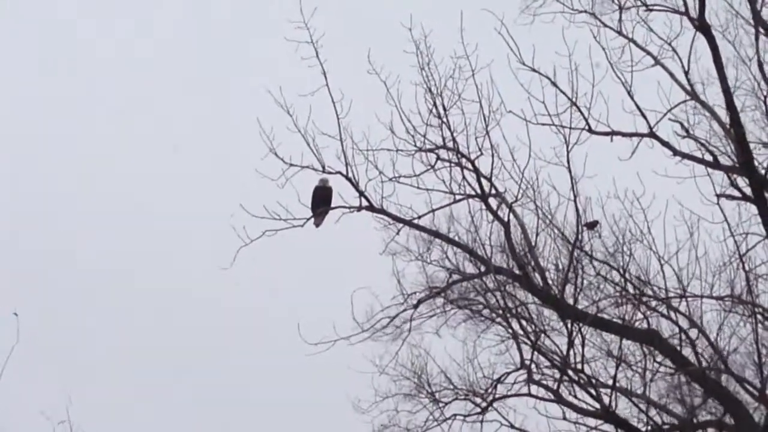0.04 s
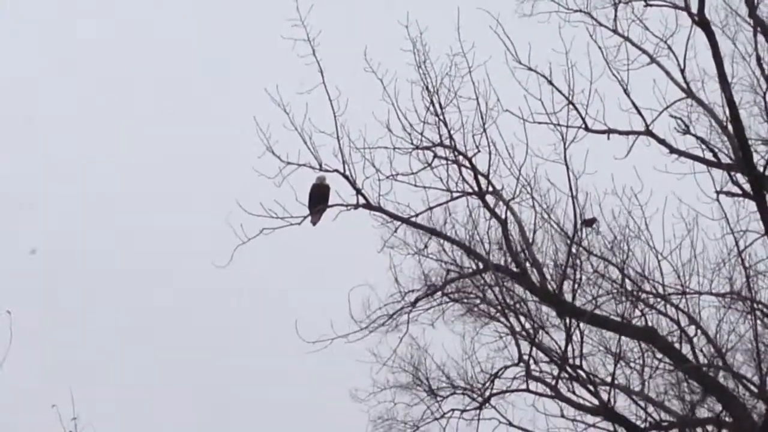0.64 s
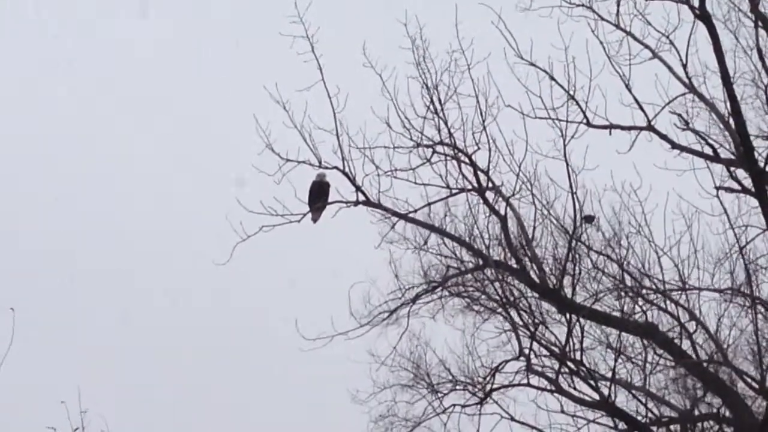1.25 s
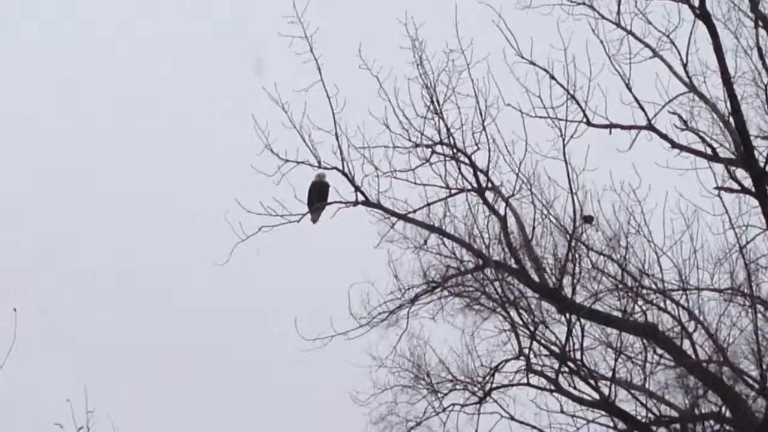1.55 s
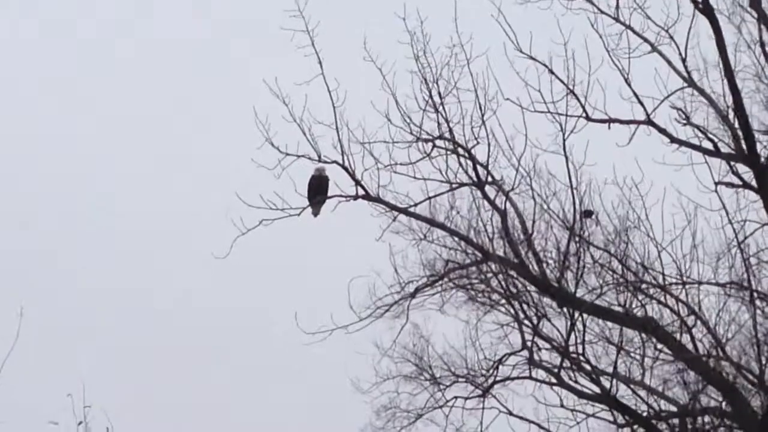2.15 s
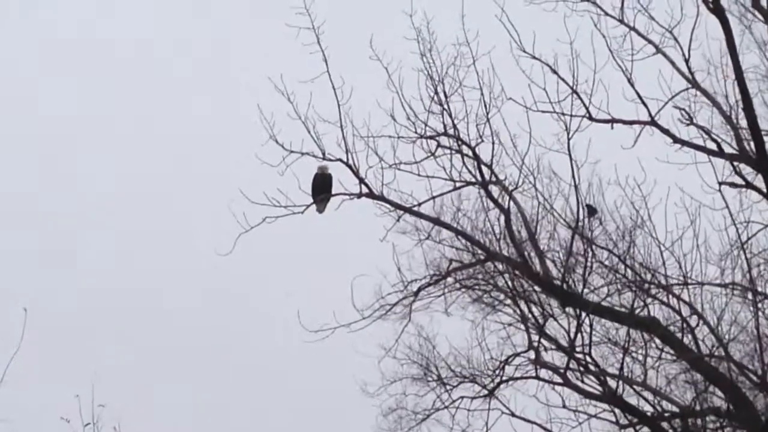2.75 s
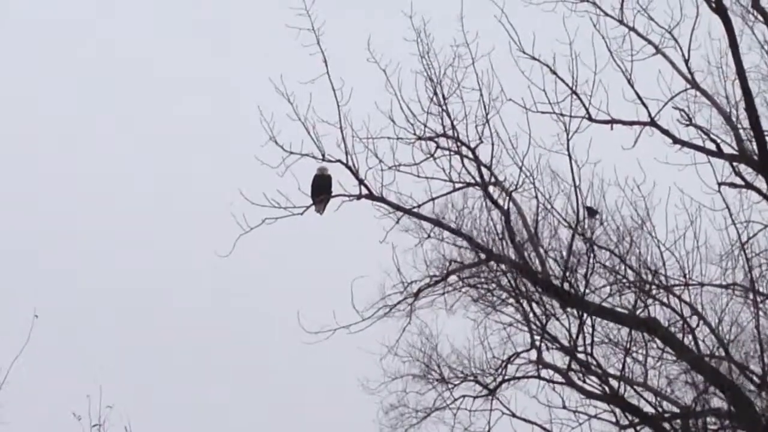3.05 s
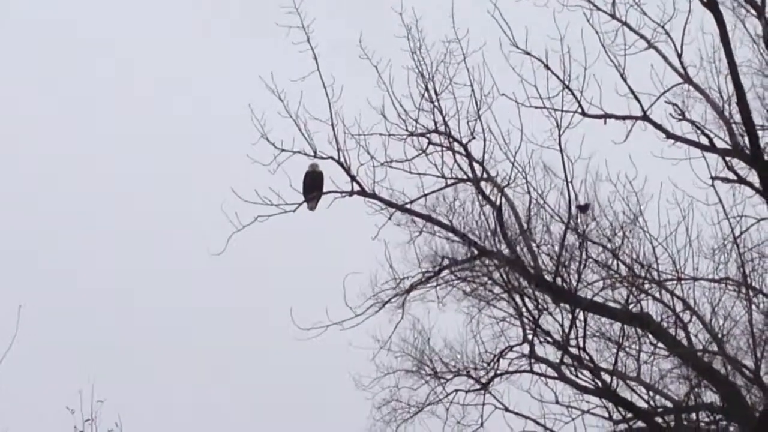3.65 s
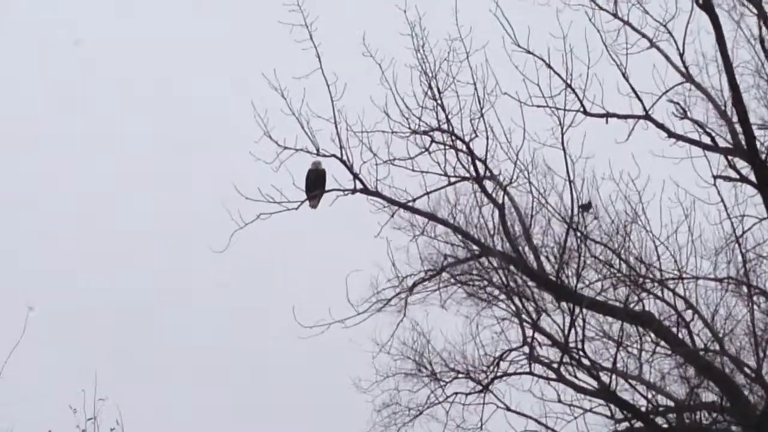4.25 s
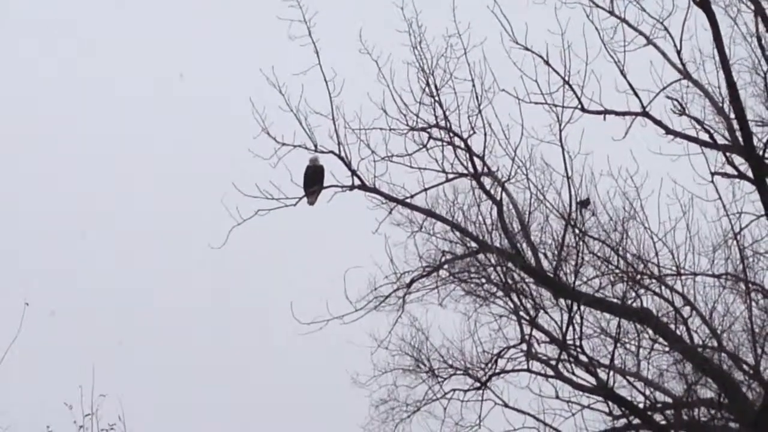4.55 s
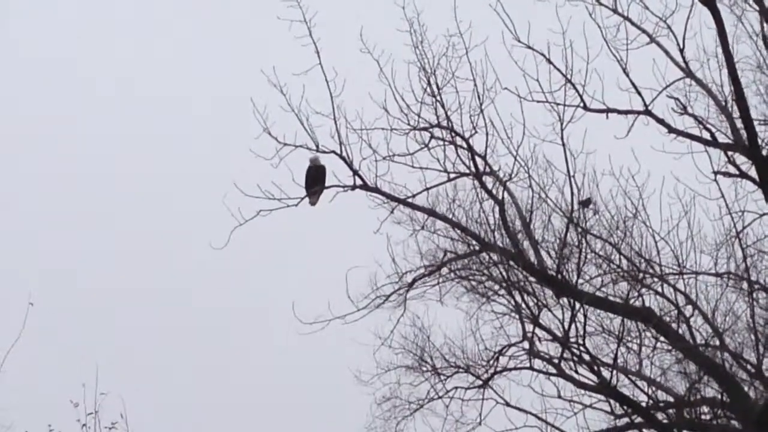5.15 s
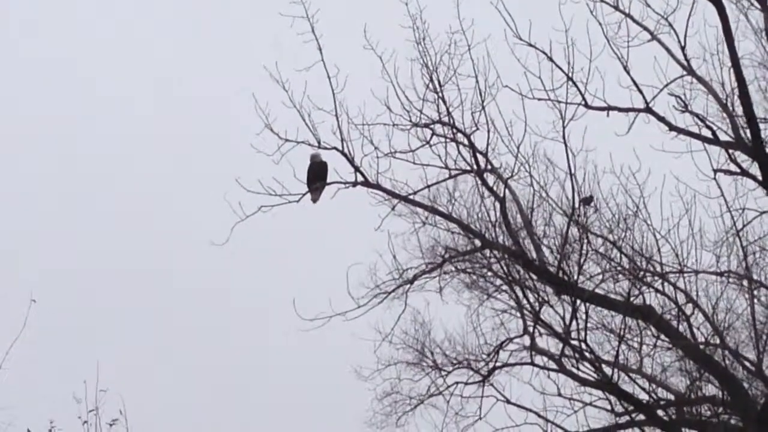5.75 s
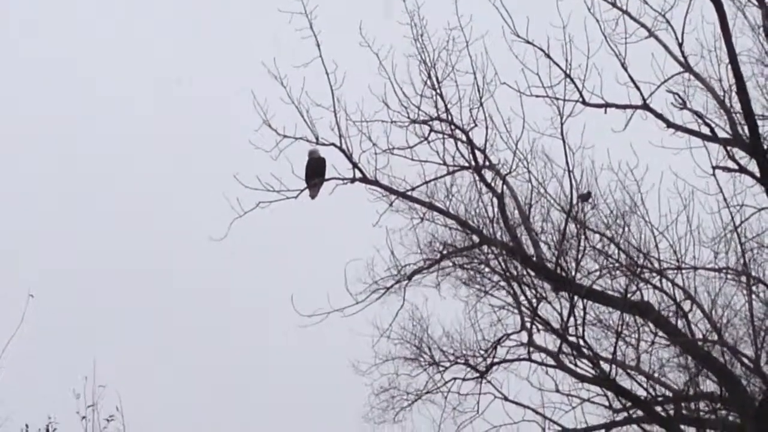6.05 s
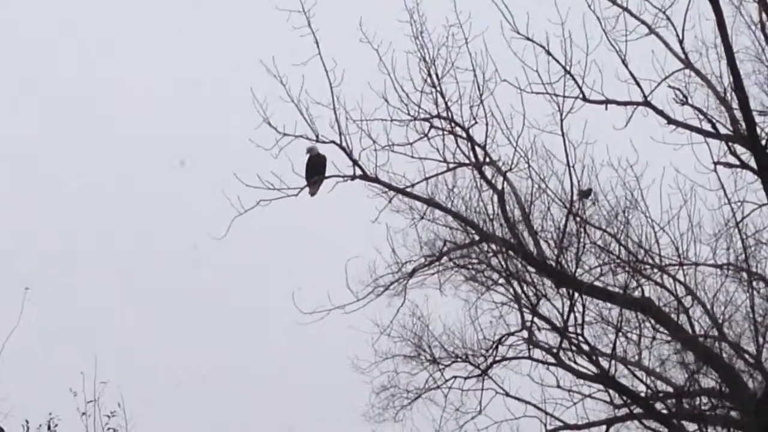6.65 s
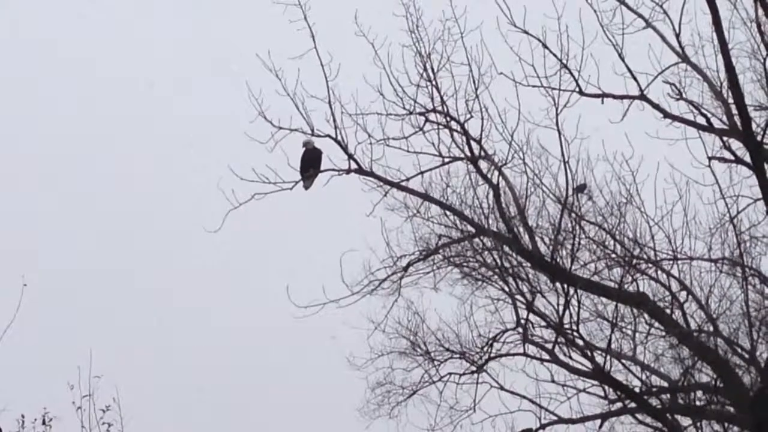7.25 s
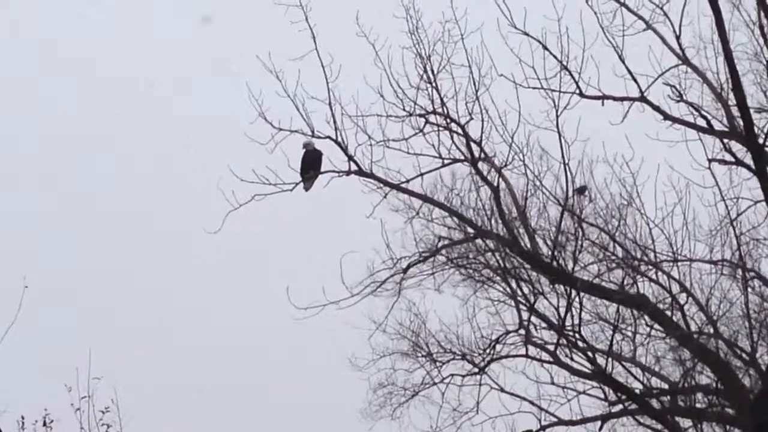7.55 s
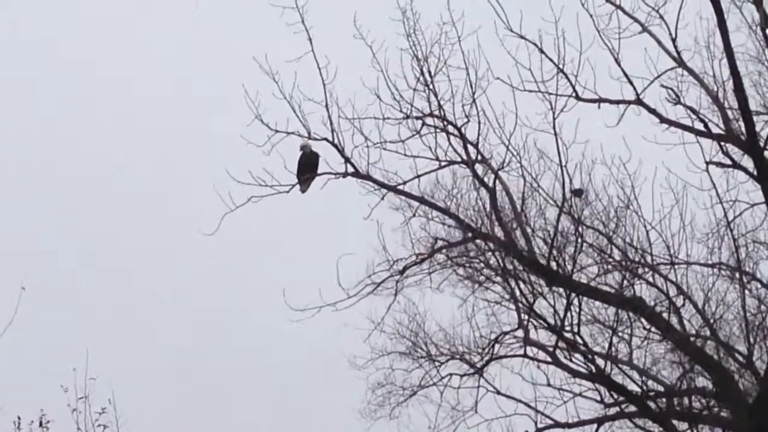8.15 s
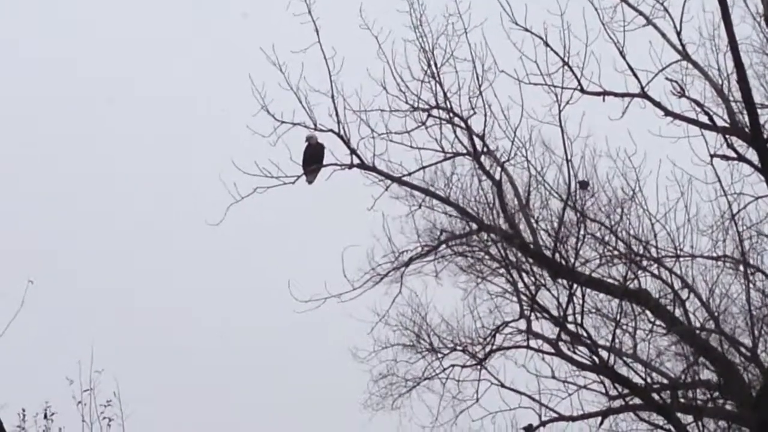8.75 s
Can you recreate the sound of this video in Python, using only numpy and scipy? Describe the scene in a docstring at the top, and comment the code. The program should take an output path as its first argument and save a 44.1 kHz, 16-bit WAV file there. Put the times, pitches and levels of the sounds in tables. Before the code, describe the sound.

Small birds chirp and twitter outdoors over steady hiss, with two hoarse crow caws and low wind gusts bumping the microphone.

```python
"""Small birds in winter trees

A distant flock chatters: thousands of tiny whistles, blurred by echoes from bare branches.
Nearer chirps, thin calls and scrapes stand out, and a hoarse crow caws twice.
Gusts thump the microphone, and a faint low hum comes and goes under the outdoor hiss."""
import sys
import numpy as np
from scipy import signal
from scipy.fft import rfft, irfft
from scipy.io import wavfile

SR = 44100
rng = np.random.default_rng(int(sys.argv[2]) if len(sys.argv) > 2 else 0)


def transcribe(u):
    """Save the signal u as a 16-bit wav file named by the first command-line argument.

    u: samples, shape (n,) or (channels, n), limited to [-1, 1]; the rate is SR.
    q: integer samples, one column per channel.
    """
    v = np.clip(np.atleast_2d(u).T, -1, 1)
    q = np.round(v * 32767).astype(np.int16)
    wavfile.write(sys.argv[1], SR, q)


N = 392931
TIME, HZ = np.arange(N) / SR, np.fft.rfftfreq(N, 1 / SR)
TWIG_ECHO_S = .22  # time for an echo in the twigs to fade by 60 dB

# how loud the far flock is (time [s], level [dB])
FLOCK_LOUDNESS = [(0.0, -49.5), (0.69, -49.5), (1.21, -48.5), (1.53, -46.5), (1.71, -51), (2.43, -49),
                  (2.75, -51), (3.57, -49.5), (3.97, -59), (4.68, -49), (5.08, -54.5), (6.22, -51),
                  (6.69, -49), (7.36, -51), (7.78, -47.5), (8.13, -51.5), (8.53, -49), (8.9, -55)]
# tone of its main chatter and of its shrill edge (frequency [Hz], boost [dB])
CHATTER_TONE = [(2000, 5.5), (2600, -14.5), (3100, -5), (3700, -1), (4400, -2), (5100, -7), (6000, -16),
                (8000, -19)]
SHRILL_TONE = [(3500, 4), (4700, 3.5), (5400, -10), (6300, -4.5), (7500, -8), (9500, -12.5), (14000, -13)]
def flock(answer_s=.23, answer_lag_s=.0065, answer_db=-4, follow=.21, flicker_db=.66):
    """The far flock chatters, and swells as neighbours join in around each near call."""
    din = coloured(chatter(2400, 6200, count=3200, warble=.031), CHATTER_TONE)
    shrill = coloured(chatter(4400, 12000, count=2400, warble=.1253), SHRILL_TONE)
    starts, lengths, *_, call_db = np.transpose(near_calls())
    peaks = starts + lengths / 2 + answer_lag_s
    extra_db = follow * (call_db - call_db.mean())  # louder calls get louder answers
    answers = swells([(s, answer_s, answer_db + db) for s, db in zip(peaks, extra_db)])
    level_db = np.interp(TIME, *np.transpose(FLOCK_LOUDNESS)) + flicker_db * drift(N, 38)
    return np.hypot(1, answers) * gain_of(level_db) * (gain_of(-.48) * din + gain_of(-15) * shrill)


def chatter(low_hz, high_hz, count, warble, spread_db=3.5, fall=.1614, bend=.1007):
    """Many far birds at once: short, shaky, arched notes that rise or fall."""
    out = np.zeros(N)
    for when, span, pitch, slope, arch, softness in rng.random((count, 6)):
        hz = low_hz * (high_hz / low_hz) ** pitch
        slide = fall * (2 * slope - .7)
        length = .014 + .032 * span
        note = whistle(length, hz * (1 + slide), hz * (1 + bend * arch), hz * (1 - slide), warble)
        add(out, when * N / SR - .02, gain_of(-spread_db * np.log(softness + .085)) * note)
    return out + gain_of(-4) * tree_echo(out, fade_s=.36)


# chirps that slide down (time [s], length [s], middle pitch [Hz], level [dB])
FALLING_CHIRPS = [(0.196, .09, 3710, -46.5), (0.753, 0.051, 4020, -46.5), (0.939, 0.056, 3600, -47.5),
                  (1.11, 0.071, 4590, -47), (1.467, 0.061, 4640, -49.5), (1.524, .069, 3700, -49),
                  (1.631, 0.032, 4070, -48.5), (1.736, 0.025, 4600, -46), (1.886, .051, 3670, -51),
                  (2.147, .04, 4300, -46.5), (2.216, .041, 3500, -47.5), (2.688, 0.039, 3770, -52),
                  (2.771, .066, 3570, -53), (2.971, 0.092, 3960, -47.5), (3.557, 0.067, 4070, -51),
                  (3.681, 0.062, 3690, -48.5), (4.129, .075, 3520, -47.5), (4.288, 0.038, 3450, -54),
                  (4.455, 0.063, 4250, -46.5), (4.527, .05, 2800, -52.5), (4.684, .09, 2840, -60),
                  (4.843, 0.052, 4180, -47.5), (5.449, 0.035, 5000, -45), (5.763, 0.071, 3820, -51),
                  (6.41, .043, 3850, -49), (6.53, .07, 3980, -46.5), (6.794, 0.045, 4210, -51.5),
                  (7.067, 0.061, 3550, -50), (7.398, 0.06, 4030, -45), (7.573, 0.039, 4150, -47.5),
                  (7.813, .041, 4220, -51), (8.318, 0.022, 4020, -44), (8.375, 0.059, 3620, -47.5),
                  (8.603, 0.089, 3850, -49.5), (8.692, .06, 2920, -53.5)]
# short chirps that go up, then down (time [s], top pitch [Hz], rise [share of top], level [dB])
ARCHED_CHIRPS = [(.455, 4180, 0.099, -42.5), (.62, 4430, 0.063, -48.5), (0.681, 4600, 0.036, -51),
                 (1.178, 3250, .02, -50), (1.418, 4460, 0.036, -46.5), (1.77, 2470, .03, -54.5),
                 (1.819, 2870, 0.12, -49), (1.995, 3930, .01, -49.5), (2.329, 2760, .03, -51),
                 (2.47, 5260, .03, -47.5), (2.531, 5420, .06, -48), (3.399, 4390, .15, -53),
                 (3.478, 4980, .05, -51), (4.716, 4550, .22, -46.5), (5.21, 4410, 0.213, -49),
                 (5.296, 5720, 0.084, -49.5), (5.33, 4790, 0.16, -50), (5.607, 4520, 0.28, -51),
                 (6.9, 5630, 0.0091, -53.5), (7.216, 4350, 0.12, -37.5), (7.258, 3590, 0.062, -42),
                 (7.746, 4260, 0.086, -49)]
def near_calls(fall=.115, arch_s=.0256, drop=.056):
    """Lists the near chirps as (time, length, start pitch, middle pitch, end pitch, level)."""
    falling = [(s, length, hz * (1 + fall), hz, hz * (1 - fall), db)
               for s, length, hz, db in FALLING_CHIRPS]
    arched = [(s, arch_s, hz * (1 - rise), hz, hz * (1 - drop), db) for s, hz, rise, db in ARCHED_CHIRPS]
    return falling + arched


def near_birds(roughness=.35, warble_per_s=.42):
    """The nearest birds chirp among the twigs; the longer a note, the more its pitch shakes."""
    out = np.zeros(N)
    for s, length, start, middle, end, db in near_calls():
        add(out, s, gain_of(db) * whistle(length, start, middle, end, warble_per_s * length))
    out *= 1 + roughness * drift(N, 250)
    return out + gain_of(-7) * tree_echo(out, TWIG_ECHO_S)


# high calls (time [s], length [s], start pitch [Hz], middle pitch [Hz], end pitch [Hz], level [dB])
THIN_CALLS = [(3.863, 0.026, 4920, 7280, 7900, -46.5), (4.594, 0.044, 7000, 8350, 7160, -66),
              (7.987, .036, 6760, 7660, 7850, -56)]
def thin_calls(lower_ratio=.89):
    """A closer bird sings with both sides of its voice box, making two sliding notes at once."""
    out = np.zeros(N)
    for s, length, start, middle, end, db in THIN_CALLS:
        upper = whistle(length, start, middle, end, warble=.012)
        lower = whistle(length, start, middle * lower_ratio, end * lower_ratio, warble=.044, octave_db=-8)
        add(out, s, gain_of(db) * (upper + gain_of(-6) * lower))
    return out + gain_of(-6) * tree_echo(out, fade_s=.31) + gain_of(-5) * tree_echo(out, fade_s=.17)


# harsh calls (peak time [s], length [s], middle pitch [Hz], level [dB])
SCRAPING_CALLS = [(1.478, 0.14, 5020, -55.5), (2.239, 0.021, 5080, -46), (2.689, 0.059, 5370, -53.5),
                  (2.964, 0.065, 5620, -56.5), (4.708, 0.089, 5500, -58), (5.762, 0.16, 5320, -57.5),
                  (6.025, 0.11, 6770, -66), (6.171, 0.093, 5170, -54), (7.389, 0.028, 5680, -55),
                  (7.645, .045, 6000, -57), (7.815, 0.028, 5380, -53), (7.968, 0.081, 5150, -55)]
def scraping_calls(warble=.15, fall=.074):
    """Bird notes whose pitch shakes so hard that they turn into a short scrape."""
    out = np.zeros(N)
    for s, length, hz, db in SCRAPING_CALLS:
        start, end = hz * (1 + fall), hz * (1 - fall)
        scrape = sum(whistle(length, start, hz, end, warble, octave_db=-26) for _ in range(3))
        add(out, s - length / 2, gain_of(db - 1) * evened(scrape))
    return out + gain_of(-6) * tree_echo(out, TWIG_ECHO_S)


# the two caws (time [s], length [s], top pitch [Hz], level [dB])
CROW_CAWS = [(5.703, .138, 753, -36.5), (6.113, .148, 757, -33.5)]
# how one caw unfolds (progress [share of length], pitch [share of top], effort [dB])
CAW_ARCH = [(0, .8, -13), (.16, .87, -8.5), (.3, 1, -2), (.45, 0.99, -3), (.58, .93, -6.5),
            (.74, .85, -7.5), (1, .79, -12.5)]
# how the crow's throat shapes its voice (frequency [Hz], boost [dB])
THROAT_TONE = [(700, -20), (1150, -1.5), (1480, 2), (1850, -2.5), (2050, -18), (2260, -7.5), (2600, -35),
               (4000, -48)]
def crow(jitter=.033, rasp=.25, rasp_hz=160, bounce_s=.096):
    """A hoarse voice rises and falls in a narrow throat; the tree line throws it back, blurred."""
    out = np.zeros(N)
    place, bend, effort_db = np.transpose(CAW_ARCH)
    hiss = gain_of(-17) * coloured(rng.standard_normal(N), THROAT_TONE)
    for s, length, top_hz, db in CROW_CAWS:
        size = int(length * SR)
        progress = np.linspace(0, 1, size)
        hz = top_hz * np.interp(progress, place, bend) * (1 + jitter * drift(size, 270))
        phase = 2 * np.pi * np.cumsum(hz) / SR
        # each overtone gets louder as it passes a pitch where the throat rings
        voice = sum(read_tone(THROAT_TONE, k * hz) * np.sin(k * phase) for k in range(1, 6))
        voice *= 1 + rasp * drift(size, rasp_hz)
        # the voice turns hoarser as the effort gives out
        push = gain_of(np.interp(progress, place, effort_db))
        caw = push * evened(voice) + np.sqrt(push) * hiss[int(s * SR):][:size]
        add(out, s, gain_of(db) * caw * signal.windows.tukey(size, .15))
    delayed = np.interp(TIME - bounce_s, TIME, out)
    bounce = gain_of(-17) * tree_echo(delayed * (1 + drift(N, rasp_hz)), TWIG_ECHO_S)
    near_echo = gain_of(-9) * tree_echo(out, TWIG_ECHO_S)
    far_echo = gain_of(-14) * tree_echo(out, fade_s=3)
    return out + bounce + near_echo + far_echo


# gusts at the microphone (peak time [s], length [s], level [dB])
WIND_GUSTS = [(.6, .15, -53), (1.24, 0.17, -47.5), (2.15, 0.87, -57.5), (2.53, 0.25, -49),
              (3.11, 0.42, -41.5), (3.32, 0.3, -38.5), (3.51, 0.32, -44), (4.025, 0.069, -41),
              (4.36, 0.077, -52), (4.625, 0.1, -41.5), (4.775, 0.11, -39), (4.93, 0.096, -45),
              (5.26, 0.23, -42.5), (5.39, 0.13, -43), (5.61, 0.12, -49), (5.85, 0.61, -51.5),
              (5.96, 0.096, -44.5), (6.17, 0.19, -29), (6.275, 0.18, -34), (6.94, 0.048, -45.5)]
# the swirls of air that hit it hardest (time [s], level [dB], pitch [Hz])
HARD_SWIRLS = [(3.096, -23, 149), (3.111, -26, 128), (3.126, -35.5, 477), (3.2, -29.5, 117),
               (3.268, -11.5, 344), (3.282, -22, 249), (3.335, -21.5, 255), (3.372, -34.5, 330),
               (3.468, -28, 226), (3.529, -27.5, 242), (4.021, -33, 100), (4.627, -27, 195),
               (4.782, -24, 144), (5.264, -31, 253), (5.398, -31.5, 180), (5.609, -27, 158),
               (5.96, -24, 176), (5.964, -26.5, 430), (6.1547, -9, 370), (6.165, -19.5, 109),
               (6.176, -22.5, 153), (6.21, -27.5, 230), (6.254, -23, 129), (6.317, -27.5, 260)]
# tone of the wind's rumble and of its finer flutter (frequency [Hz], boost [dB])
RUMBLE_TONE = [(15, -24), (35, -16), (65, 2.5), (130, -3.5), (200, -14), (320, -18.5), (600, -35.5),
               (1200, -38.5), (2500, -64)]
FLUTTER_TONE = [(100, -9), (250, 3), (500, -3.5), (800, -13.5), (1200, -26), (2500, -42)]
def wind(breeze_db=-60, fade_db_per_s=.57, cap_db=-38, lumpy_db=3, low_hz=105, high_hz=260, count=420):
    """Churning air rumbles; each swirl that hits the microphone is one quick swing of pressure."""
    strength = np.hypot(swells(WIND_GUSTS), gain_of(breeze_db - fade_db_per_s * TIME))
    level_db = np.minimum(20 * np.log10(strength), cap_db) + lumpy_db * drift(N, 23)
    out = gain_of(level_db - 1) * coloured(rng.standard_normal(N), RUMBLE_TONE)
    # flutter grows twice as fast as rumble, so only strong gusts sound brighter
    flutter_db = -49 + 2 * (level_db - cap_db)
    out += gain_of(flutter_db) * coloured(rng.standard_normal(N), FLUTTER_TONE)
    small_swirls = [(when * N / SR, level_db[int(when * N)] + 5.5, low_hz * (high_hz / low_hz) ** pitch)
                    for when, pitch in rng.random((count, 2))]
    t = np.arange(-SR // 30, SR // 30) / SR
    for s, db, hz in HARD_SWIRLS + small_swirls:
        thump = np.cos(2 * np.pi * hz * t - np.pi / 4) / np.cosh(t * hz / .3)
        add(out, s + t[0], gain_of(db) * thump)
    return out


# swells of the hum (peak time [s], rise time [s], level [dB])
HUM_SWELLS = [(.16, 0.3, -52.5), (1.85, 0.49, -55), (8.15, 0.48, -54)]
# tone of the low rush around it (frequency [Hz], boost [dB])
RUSH_TONE = [(100, -27), (170, -1), (220, -4.5), (270, 2.5), (310, 2.5), (330, -3), (380, -6), (460, -17),
             (800, -37)]
def hum(pitch_hz=298.3, waver_hz=1.77, fade_db_per_s=10.5):
    """A wavering note in a low rush swells and slowly fades, perhaps tyres on a far road."""
    hz = pitch_hz + waver_hz * drift(N, 9.4)
    note = evened(np.sin(2 * np.pi * np.cumsum(hz) / SR) * (1 + .41 * drift(N, 8.4)))
    rush = coloured(rng.standard_normal(N), RUSH_TONE)
    level = np.zeros(N)
    for s, rise_s, db in HUM_SWELLS:
        fade_in = np.clip(1 + (TIME - s) / rise_s, 0, 1)
        level += fade_in * gain_of(db - fade_db_per_s * np.maximum(TIME - s, 0))
    return level * gain_of(-2) * (note + rush)


# tone of the outdoor hiss (frequency [Hz], boost [dB])
AIR_TONE = [(20, -17), (55, 8), (90, 3.5), (200, 3), (400, -2.5), (700, -1), (1100, -3.5), (1600, -3),
            (2300, -9.5), (4000, -10), (7000, -20), (10000, -22.5), (15000, -24)]
def air(level_db=-55, rise_db=1.5):
    """The even hiss of the open air, growing very slightly."""
    level = gain_of(level_db + rise_db * np.linspace(-.5, .5, N))
    return level * coloured(rng.standard_normal(N), AIR_TONE)


def whistle(length, start_hz, middle_hz, end_hz, warble, octave_db=-32):
    """One bird note that bends through three pitches; warble shakes the pitch at random."""
    progress = np.linspace(0, 1, max(int(length * SR), 64))
    knots = np.linspace(0, 1, len(progress) // 40 + 2)
    hz = np.polyval(np.polyfit([0, .5, 1], [start_hz, middle_hz, end_hz], 2), progress)
    shake = np.interp(progress, knots, rng.standard_normal(len(knots)))
    phase = 2 * np.pi * np.cumsum(hz * (1 + warble * shake)) / SR
    level = np.sqrt(2 * abs(np.sin(np.pi * progress))) * signal.windows.tukey(len(progress), .2)
    return level * (np.sin(phase) + gain_of(octave_db) * np.sin(2 * phase))


def tree_echo(sound, fade_s, echoes_per_s=3000):
    """Trunks and branches scatter a sound into many weak echoes that fade by 60 dB in fade_s."""
    t = np.arange(SR) / SR
    echoes = rng.standard_normal(SR) * (rng.random(SR) < echoes_per_s / SR)
    echoes *= gain_of(-60 * t / fade_s) * (t > .004)
    return signal.fftconvolve(sound, echoes / np.linalg.norm(echoes))[:N]


def swells(rows):
    """A smooth rise and fall for each row of (peak time [s], length [s], level [dB])."""
    power = np.zeros(N)
    for s, length, db in rows:
        add(power, s - length / 2, (gain_of(db) * signal.windows.hann(int(length * SR))) ** 2)
    return np.sqrt(power)


def gain_of(db):
    """Turns decibels into a number to multiply a sound by."""
    return 10 ** (np.asarray(db) / 20)


def evened(sound):
    """Scales a sound to an average power of one."""
    return sound / np.sqrt(np.mean(sound ** 2) + 1e-20)


def read_tone(tone, hz):
    """Looks up how strongly a tone table lets a frequency through."""
    table_hz, db = np.transpose(tone)
    return gain_of(np.interp(np.log(hz + 1), np.log(table_hz), db))


def coloured(sound, tone):
    """Shapes a sound's bass and treble with a tone table, at a power of one."""
    return evened(irfft(rfft(sound) * read_tone(tone, HZ), N))


def drift(size, rate_hz):
    """A smooth random wobble, up to about rate_hz fast."""
    padded = size + SR // 4
    keep_slow = 1 / (1 + (np.fft.rfftfreq(padded, 1 / SR) / rate_hz) ** 4)
    return evened(irfft(rfft(rng.standard_normal(padded)) * keep_slow))[:size]


def add(mix, s, sound):
    """Mixes a sound in, starting at s seconds."""
    part = mix[max(round(s * SR), 0):][:len(sound)]
    part += sound[:len(part)]


def scene():
    """Birds, wind and background meet at one microphone."""
    birds = near_birds() + thin_calls() + scraping_calls() + flock() + crow()
    return (birds + wind() + hum() + air())[None]


def record(dry):
    """Cuts away the very highest treble."""
    treble_cut = signal.firwin(1501, cutoff=15300, window=("kaiser", 9), fs=SR)
    return signal.oaconvolve(dry, treble_cut[None], "same")


dry = scene()
out = record(dry)
transcribe(out)
```